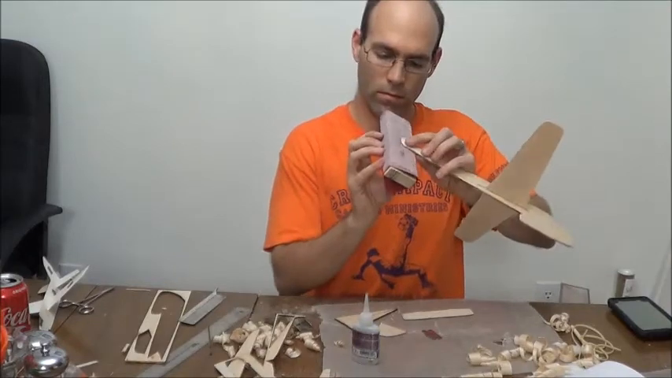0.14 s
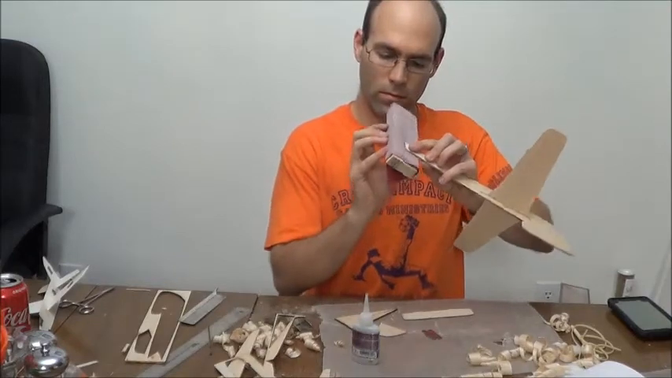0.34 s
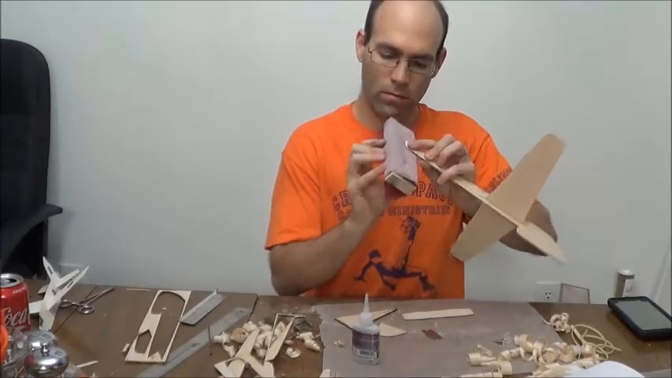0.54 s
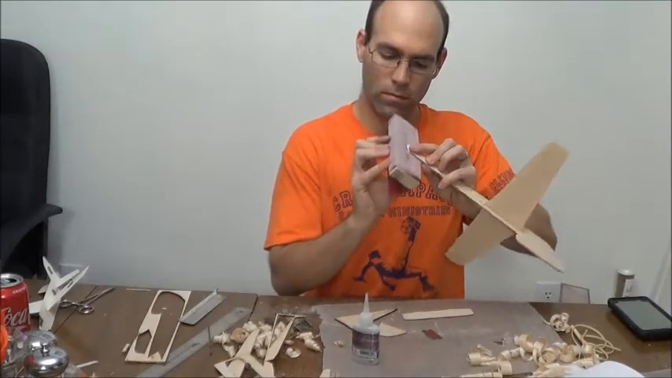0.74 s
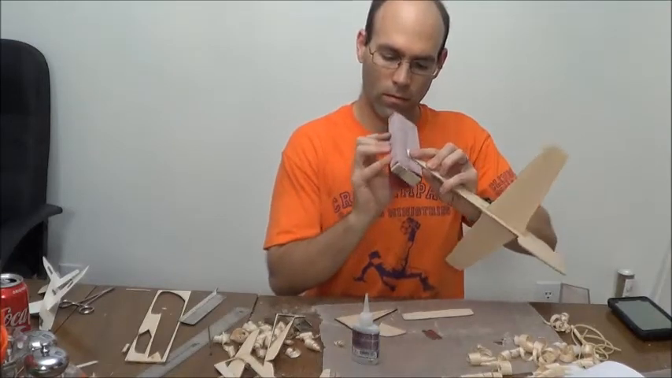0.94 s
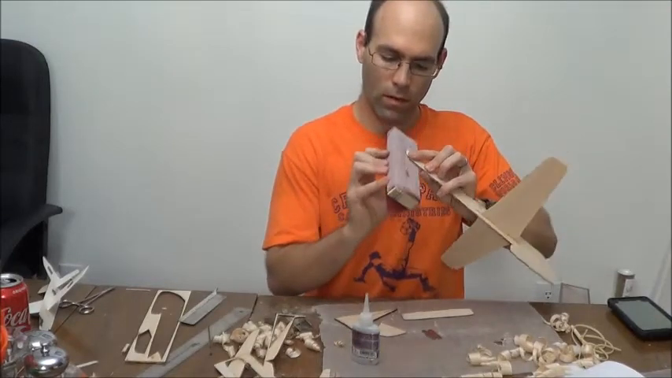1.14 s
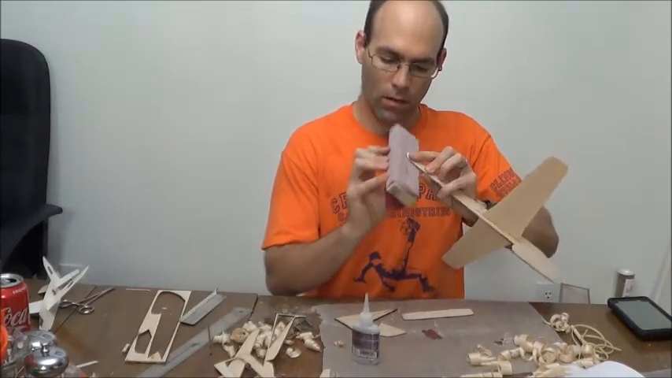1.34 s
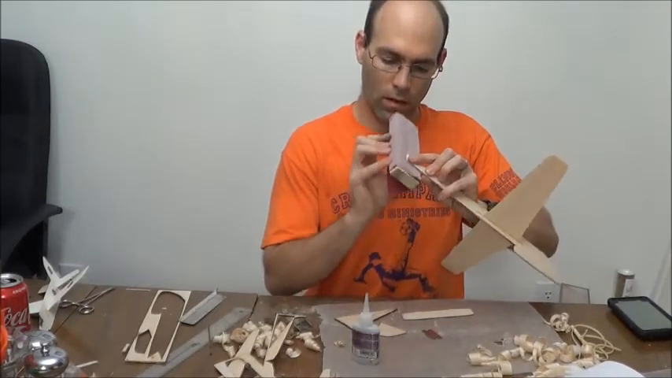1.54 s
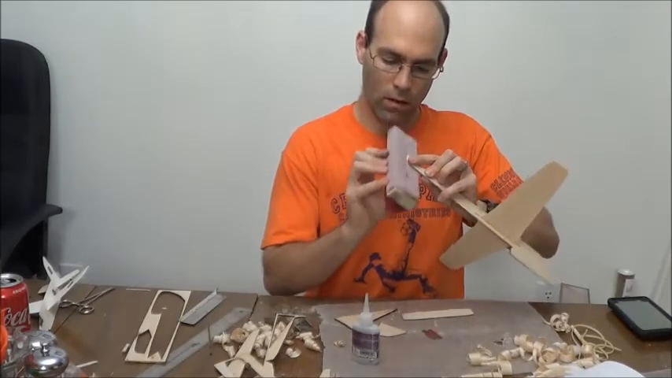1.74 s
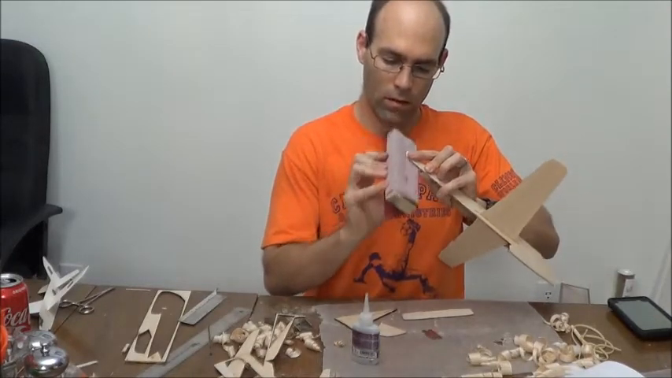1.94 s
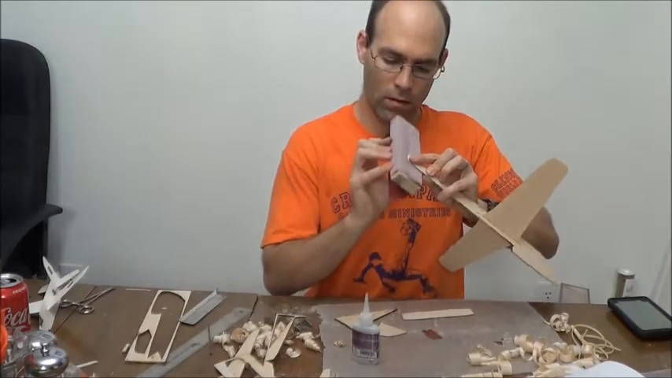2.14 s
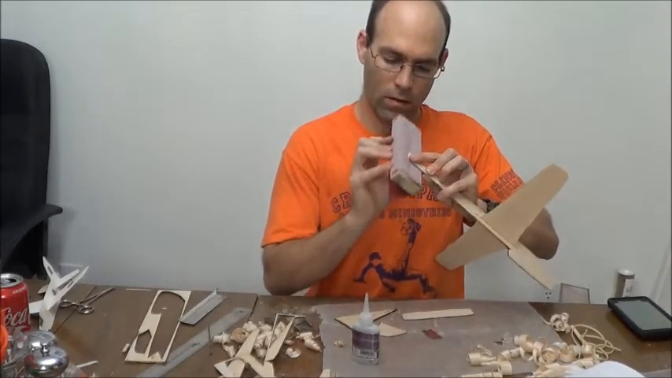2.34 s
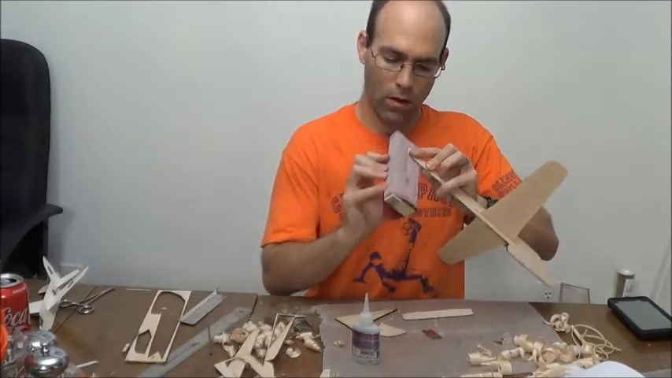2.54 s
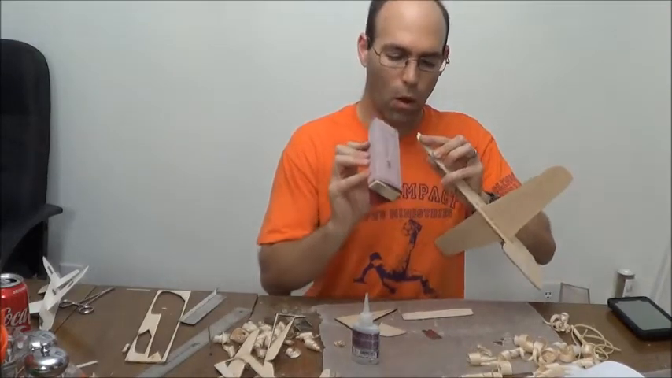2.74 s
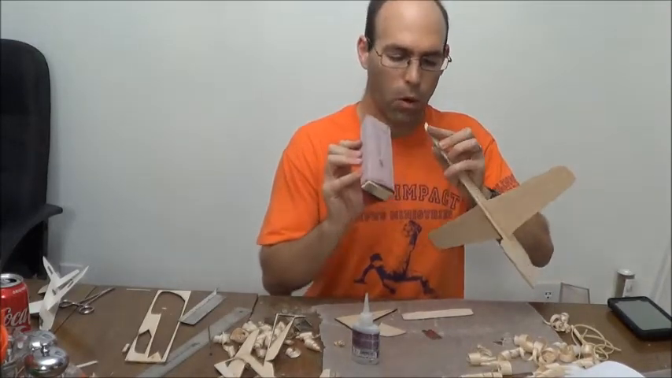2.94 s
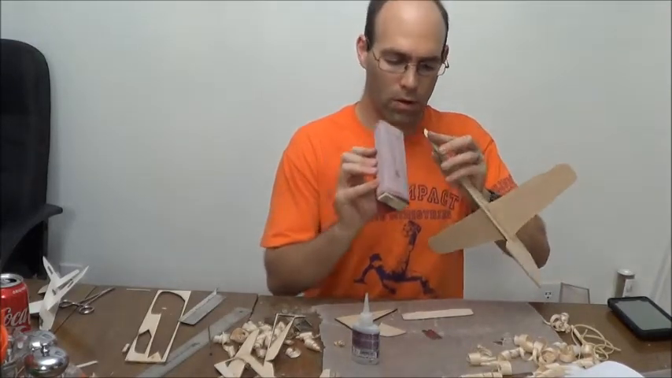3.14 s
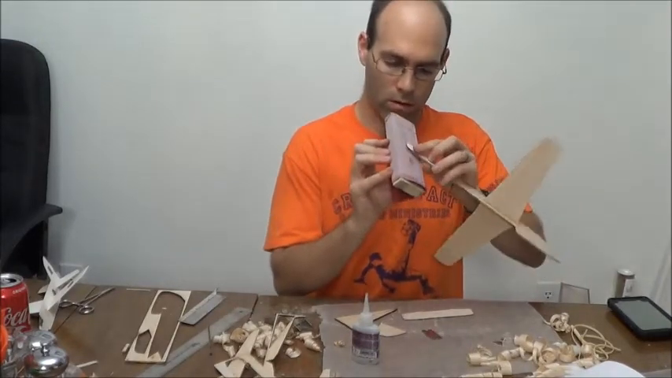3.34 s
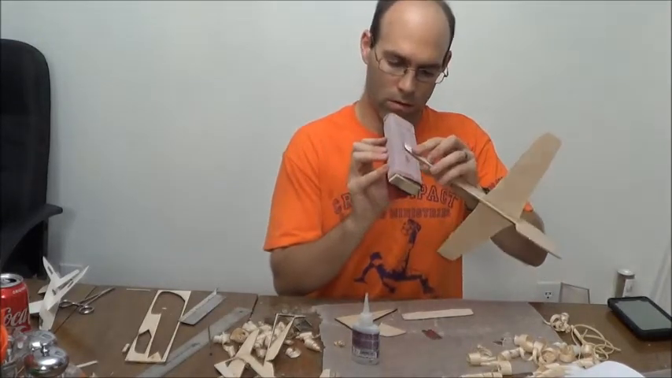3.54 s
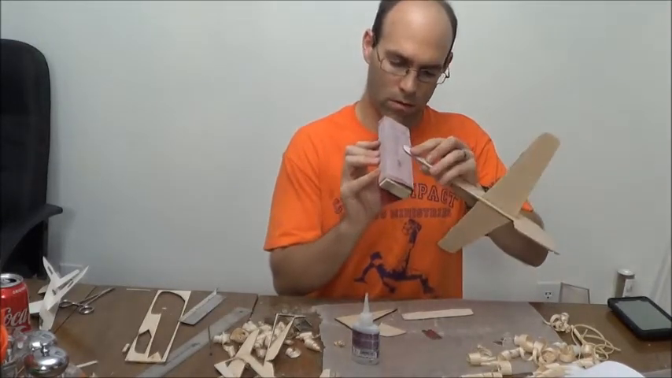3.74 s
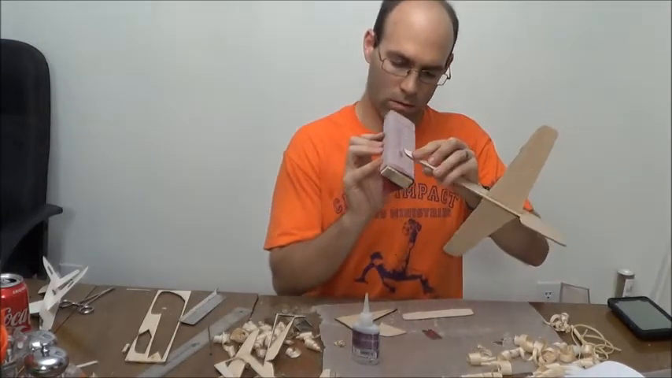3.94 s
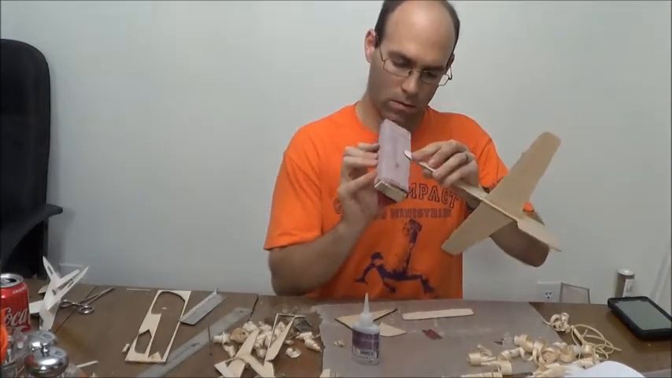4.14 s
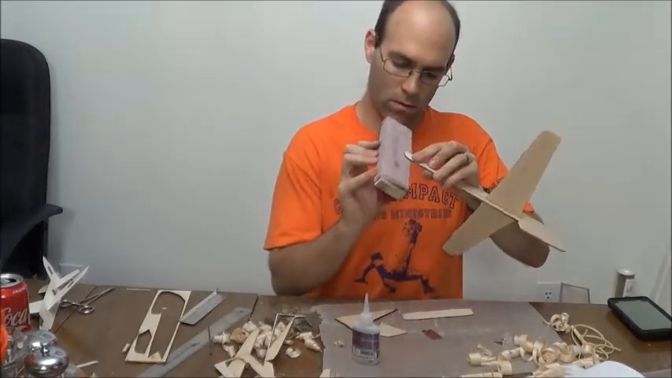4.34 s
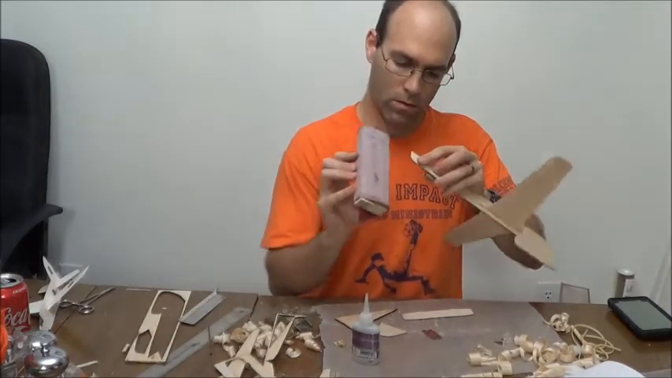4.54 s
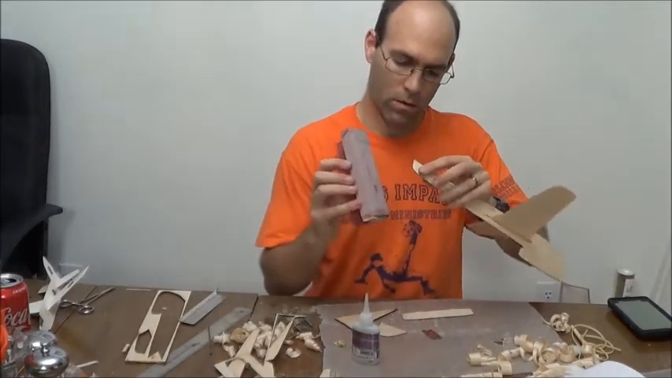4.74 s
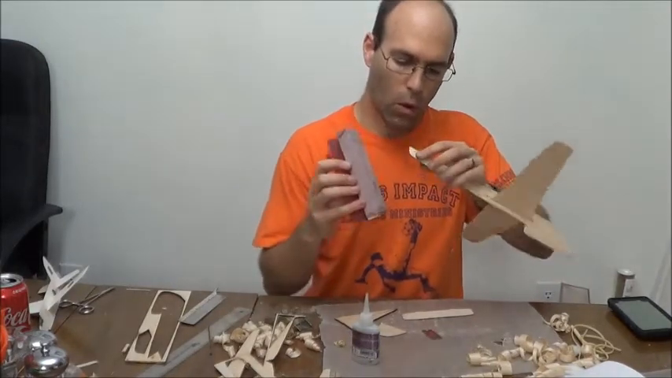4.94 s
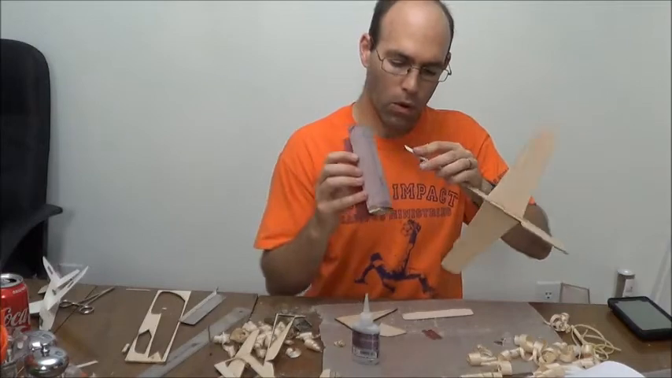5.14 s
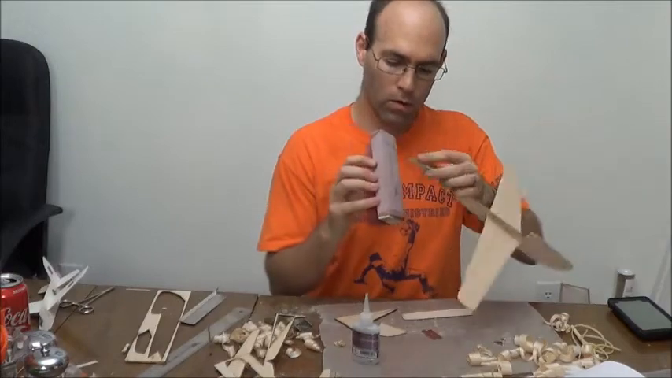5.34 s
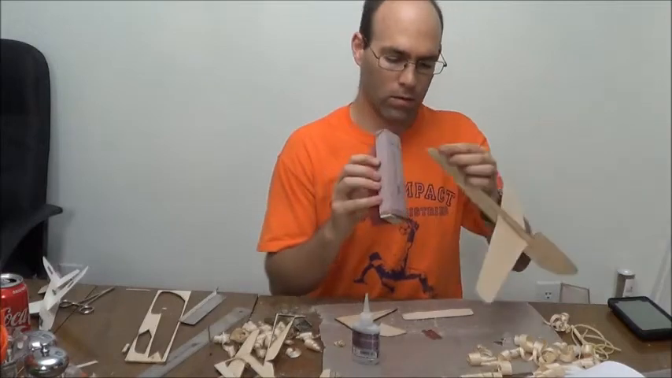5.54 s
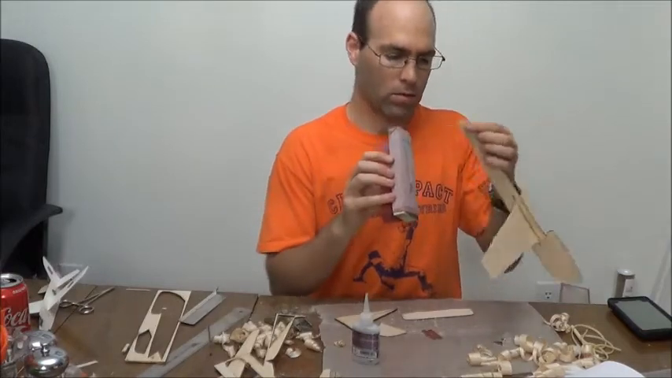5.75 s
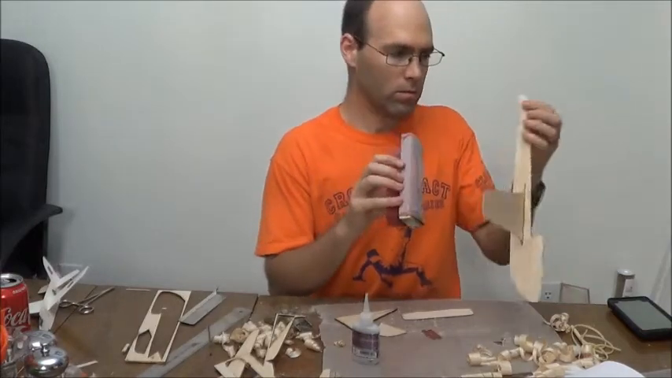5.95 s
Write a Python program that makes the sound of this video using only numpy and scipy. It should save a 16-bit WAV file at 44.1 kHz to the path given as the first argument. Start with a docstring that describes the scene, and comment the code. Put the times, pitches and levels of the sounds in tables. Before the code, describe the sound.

A small bare room holds steady airy noise, a very faint low mains hum and a thin, very high whistle. Light scuffs open the scene at 0-0.2 s. From 0.2 to 2.6 s a sanding block rubs to and fro on light balsa, about seven strokes a second; each swells and fades as bright gritty hiss, with a quieter hollow, papery ringing of thin wood. Some strokes are stronger, alternating slightly. A pause follows, with a faint brush near 3.0 s and small ticks at 3.35-3.5 s. Two very faint rubs lead into four softer, slightly slower strokes at 3.85-4.5 s. Light scuffs and two small ticks come at 4.6-4.8 s, then quiet. Handling rustles begin at 5.3 s; the sharpest knock, at 5.43 s, rattles woodily until 5.6 s. Another scuff and small taps come at 5.7-5.9 s. The bench sounds are close and central, with a short, wide echo.

```python
"""A light scuff over room hum, then a sanding block rubs to and fro on the nose of a balsa glider.
The place is a small bare room. Clumped grit clicks make the bright hiss and set the thin sheets ringing;
in the pauses hands and parts scuff (softer grit) and tap (noise bursts into wood resonances).
Steady noise, a low mains tone and a very high whistle lie underneath; a wide echo surrounds the bench."""
import sys
import numpy as np
from scipy import signal
from scipy.io import wavfile
from scipy.ndimage import uniform_filter1d

SR = 44100
rng = np.random.default_rng(int(sys.argv[2]) if len(sys.argv) > 2 else 0)


def to_wav(s):
    """Save 16-bit WAV."""
    ch = np.atleast_2d(s).T  # columns
    pcm = np.round(np.clip(ch, -1, 1) * 32767)  # PCM
    wavfile.write(sys.argv[1], SR, pcm.astype(np.int16))


N = 263718

# Bright hiss of grit on wood. Each row: frequency in Hz, relative spectral level in dB.
GRIT_HISS = [(120, -44), (1300, -30), (2300, -19), (2800, -13.5), (3500, -9.5), (4600, -12), (5200, -7),
             (6100, -6), (7200, -9), (8200, -3), (8900, 1.5), (10500, -1.5), (12500, -5.5), (13500, -9),
             (14300, -10), (15200, -12.5), (15800, -18)]
# Balsa sheets held in the hand, lowest mode first.
# Each row: frequency in Hz, width of one filter pass in Hz, relative level in dB.
SHEET_MODES = [(484, 65, -4), (795, 50, -11), (850, 60, -14), (915, 60, -11), (1040, 70, -10),
               (1105, 60, -3), (1288, 50, -7), (1357, 50, -8), (1405, 40, -11), (1630, 60, -6),
               (1700, 60, -5), (1775, 70, -1.5), (1840, 80, 1.5), (2095, 100, -9), (2208, 90, -3),
               (2295, 70, -10), (2440, 130, -8), (2580, 100, -9)]


def gain_of(db):
    """Decibels to amplitude."""
    return 10 ** (np.asarray(db) / 20)


def evened(x):
    """Scales to rms 1."""
    return x / np.sqrt(np.mean(x ** 2) + 1e-20)


def read(points, hz):
    """Reads a curve of (Hz, value) points on a log-frequency axis."""
    f, value = np.transpose(points)
    return np.interp(np.log(hz + 1), np.log(f + 1), value)


def coloured(x, points):
    """Causal, minimum-phase filter with the given spectrum, scaled to keep the level of white input."""
    hz = abs(np.fft.fftfreq(4096, 1 / SR))
    log_gain = np.log(gain_of(np.maximum(read(points, hz), -100)))
    response = np.exp(np.conj(signal.hilbert(log_gain)))
    impulse = np.fft.ifft(response).real[:2048]
    return signal.oaconvolve(x, impulse / np.linalg.norm(impulse), axes=-1)[:len(x)]


def rung(x, modes):
    """Sum of fixed resonances, each applied twice for dark valleys; neighbours swing in opposite sense."""
    out = np.zeros(len(x))
    for k, (hz, width, db) in enumerate(modes):
        b, a = signal.iirpeak(hz, hz / max(width, 5), SR)
        once = signal.lfilter(b, a, x)
        out += (-1) ** k * gain_of(db) * signal.lfilter(b, a, once)
    return out


def grains(per_s, spread_db, clump_db):
    """Grit particles catching fibres: dense clicks of uneven size that come in short clumps."""
    sign = rng.choice([-1., 1.], N)
    size = gain_of(spread_db * np.minimum(rng.exponential(1, N), 3.5)) * sign
    drift = uniform_filter1d(rng.standard_normal(N), 70)
    clumps = evened(uniform_filter1d(drift, 70))
    catches = rng.random(N) < per_s / SR
    return evened(size * catches * gain_of(clump_db * clumps))


def shuffled(grit):
    """The same clicks with newly drawn signs, so that layers sharing their timing stay unrelated in phase."""
    return grit * rng.choice([-1., 1.], N)


def patchy(x, patchy_db):
    """The contact shifts, so parts of the spectrum swell and sink."""
    z = signal.stft(x, nperseg=256)[2]
    across_hz = uniform_filter1d(rng.standard_normal(z.shape), 4, 0)
    patches = evened(uniform_filter1d(across_hz, 24, 1))
    return evened(signal.istft(z * gain_of(patchy_db * patches), nperseg=256)[1][:N])


def ringing(grit, gain, modes):
    """Grit under a gain curve drives modes, scaled to about rms 1 at gain 1."""
    return rung(shuffled(grit) * gain, modes) / np.std(rung(grit, modes))


def hum():
    """Steady air and electronics noise with slight patches, plus a mains tone, its octave and a whistle."""
    # Steady tones. Each row: frequency in Hz, rms level in dB ahead of the microphone.
    tone_rows = [(60, -74), (120, -73), (15735, -53.5)]
    # Stereo likeness of the noise. Each row: frequency in Hz, left-right likeness from 0 to 1.
    likeness = [(60, .99), (150, .98), (380, .8), (950, .24), (2380, .18), (5980, .47), (11000, .9),
                (15000, .99)]
    # Room and electronics noise. Each row: frequency in Hz, relative spectral level in dB.
    air = [(18, -40), (30, -19), (60, -14), (100, -11), (160, -6), (250, -2), (400, 0), (630, -5),
           (1000, -4.5), (2000, -9), (4000, -11), (6300, -11), (9000, -9.5), (13000, -14), (15800, -15)]
    air_db, patch_db = -43.7, 0.77

    frames, hz = N // 256 + 5, np.fft.rfftfreq(1024, 1 / SR)
    a, b, c, d, patches = rng.standard_normal((frames, 513, 5)).T
    patches = evened(uniform_filter1d(uniform_filter1d(patches, 12, 0), 14, 1))
    same = np.clip(read(likeness, hz), -1, 1)[:, None]
    left = a + 1j * b
    right = same * left + np.sqrt(1 - same ** 2) * (c + 1j * d)
    z = np.array([left, right]) * gain_of(read(air, hz)[:, None] + patch_db * patches)
    noise = evened(signal.istft(z, nperseg=1024, noverlap=768)[1][:, :N])

    t, tones = np.arange(N) / SR, np.zeros(N)
    for f, db in tone_rows:
        tones += np.sqrt(2) * gain_of(db) * np.sin(2 * np.pi * (f * t + rng.random()))
    return gain_of(air_db) * noise + tones


def brushes():
    """Each scuff rises, holds and dies away; hiss and rustle share the shape."""
    # Light scuffs of fingers, block and parts. Each row: start, rise, hold and fade in seconds,
    # relative hiss in dB, relative low rustle in dB.
    scuff_rows = [(0.0, 0.0029, 0.051, 0.063, -40, -49), (0.076, 0.036, .008, 0.055, -36.5, -63),
                  (3.031, .02, 0.022, 0.02, -41.5, -54.5), (3.241, 0.014, 0.027, 0.3, -49, -57.5),
                  (3.378, 0.0078, .003, .025, -35, -42.5), (3.4, .01, .075, .035, -47.5, -56.5),
                  (4.61, .012, .012, 0.12, -42.5, -57), (4.64, 0.062, 0.072, 0.018, -39, -52.5),
                  (5.315, 0.019, .016, 0.069, -36, -55), (5.386, 0.036, .006, 0.044, -32.5, -48),
                  (5.425, .006, .008, 0.16, -29.5, -37.5), (5.706, 0.053, 0.058, .04, -34, -49),
                  (5.873, .003, .016, .05, -30, -40), (5.888, .012, .04, .06, -48, -46)]
    fade_db = -20  # lost in one fade time
    t, gains = np.arange(N) / SR, np.zeros((2, N))
    for start, rise, hold, fade, hiss_db, rustle_db in scuff_rows:
        onset = np.clip((t - start) / max(rise, .001), 0, 1) ** 2
        fades_passed = np.maximum(t - start - rise - hold, 0) / max(fade, .005)
        gains += gain_of([[hiss_db], [rustle_db]]) * onset * gain_of(fade_db * fades_passed)
    return gains


def scuffs():
    """Sparser, lighter friction; the sheets ring a little here too."""
    # Low rustle. Each row: frequency in Hz, relative spectral level in dB.
    rustle_spectrum = [(150, -35), (410, -10), (700, 1.5), (941, 0), (1090, -15), (1220, -5), (1850, -7),
                       (2370, -16), (5000, -30.5), (6500, -22), (11000, -120)]
    # Scuff hiss. Each row: frequency in Hz, relative spectral level in dB.
    hiss_spectrum = [(1760, -28), (3000, -5.5), (3440, -6), (4600, -8.5), (4800, -8), (6150, -0.5),
                     (7200, -7), (8160, -1), (9830, 1), (15600, -16)]
    hiss_gain, body_gain = brushes()
    grit = grains(per_s=6000, spread_db=3.6, clump_db=0.43)
    rustle = body_gain * patchy(coloured(shuffled(grit), rustle_spectrum), 4.8)
    hiss = hiss_gain * patchy(coloured(grit, hiss_spectrum), 2.9)
    return hiss + rustle + gain_of(1.5) * ringing(grit, body_gain, SHEET_MODES)


def taps():
    """A gritty tick of a few ms, and the wood ringing and rattling under it."""
    # Taps of wood on block or bench. Each row: start in seconds, relative tick level in dB,
    # duller part of the tick over it in dB, drive of the knock's body over the tick in dB.
    tap_rows = [(3.3548, -36.5, -2, -14), (3.3847, -24.5, 0.5, -20), (3.4144, -33, -11, -14),
                (3.4715, -29.5, -29, -39), (4.6937, -25.5, -3.5, -25.5), (4.7915, -24, -27, -19.5),
                (5.4311, -13.5, 2.5, -10), (5.4444, -24, -19, -4.5), (5.4844, -22.5, -13.5, -1.5),
                (5.5114, -26.5, 3, -1.5), (5.5494, -28, -15, -15), (5.5894, -42, -9, -7),
                (5.8262, -23, -19, -27), (5.8754, -23.5, -17, -20), (5.8844, -19.5, 2, -25)]
    # Knocked wood. Each row: frequency in Hz, width of one filter pass in Hz, relative level in dB.
    knock_modes = [(550, 110, 5.5), (620, 74, 4), (723, 97, 5.5), (845, 110, -5), (1020, 130, -4),
                   (1170, 83, 5.5), (1296, 120, -4), (1383, 150, 3), (1830, 90, -14.5), (2410, 79, -17)]
    t, tick, blow = np.arange(1500) / SR, np.zeros(N + 1500), np.zeros(N + 1500)
    # a sharp decay with a longer, weaker one under it
    snap = 0.47 * (np.exp(-t / 0.0018) + 0.36 * np.exp(-t / 0.012))
    push = 10.5 * (np.exp(-t / 0.00089) + 0.2 * np.exp(-t / .015))
    dull_band = signal.butter(2, [1300, 4200], "band", fs=SR)
    for start, tick_db, dull_db, body_db in tap_rows:
        bright, dull, low = rng.standard_normal((3, len(t)))
        dull = evened(signal.lfilter(*dull_band, dull))
        first = round(start * SR)
        at = slice(first, first + len(t))
        tick[at] += gain_of(tick_db) * (coloured(bright, GRIT_HISS) + gain_of(dull_db) * dull) * snap
        blow[at] += gain_of(tick_db + body_db) * low * push
    return (tick + rung(blow, knock_modes))[:N]


def arches():
    """Block speed is a skewed, flat-topped arch; hiss follows it closely, the wood less so."""
    # Strokes of the block. Each row: start in seconds, length in seconds, share of the length at top
    # speed from 0 to 1, then relative levels in dB of grit hiss, sheet ringing and lowest mode.
    strokes = [(.216, .16, .45, -21, -34.5, -45.5), (0.421, 0.15, 0.39, -18, -32.5, -41.5),
               (.587, .14, 0.34, -16.5, -31, -44.5), (0.743, .13, 0.42, -17, -33.5, -47),
               (0.89, .136, .33, -15, -31, -43), (1.037, .128, 0.39, -16, -33.5, -47),
               (1.182, .132, 0.34, -13.5, -31.5, -46), (1.331, 0.13, 0.3, -16, -33.5, -46),
               (1.475, 0.12, 0.36, -14, -32, -44), (1.622, 0.12, .33, -19, -32, -42),
               (1.767, 0.12, .38, -12, -33, -47), (1.903, 0.12, 0.36, -16.5, -35.5, -45),
               (2.045, 0.12, 0.34, -14, -31, -41), (2.184, 0.1, 0.38, -15.5, -36, -44),
               (2.316, 0.12, .4, -14.5, -33, -45), (2.462, 0.15, .33, -16, -33.5, -47.5),
               (3.54, .16, .6, -39, -49, -50), (3.64, .18, .6, -33, -45, -45),
               (3.852, 0.13, 0.38, -24.5, -35, -48.5), (4.012, .139, 0.44, -22, -35, -48),
               (4.171, .138, 0.36, -22.5, -36, -48), (4.327, .16, 0.42, -21.5, -35.5, -51)]
    cruise = 1.3  # how far the arm levels off the top of the arch
    hiss_law, ring_law, lowest_law = 1.9, .7, .4  # each gain is the block's speed to this power
    # the turn of direction jolts the lowest mode, and the higher ones by a share of it
    peak_jolt_db, jolt_s, jolt_share = 4.5, .018, .4
    grip_db, grip_s = 1.1, .025  # the grip on the sheets wavers by chance

    gains = np.zeros((3, N))
    for start, length, top, hiss_db, ring_db, lowest_db in strokes:
        t = np.arange(0, length, 1 / SR)
        skew = np.log(.5) / np.log(np.clip(top, .1, .9))  # puts the peak at the share "top"
        arch = abs(np.sin(np.pi * (t / length) ** skew))
        speed = np.tanh(cruise * arch) / np.tanh(cruise)
        jolt_db = peak_jolt_db * np.exp(-(t / jolt_s - 1) ** 2)
        first = round(start * SR)
        gains[:, first:first + len(t)] += [
            gain_of(hiss_db) * speed ** hiss_law,
            gain_of(ring_db + jolt_share * jolt_db) * speed ** ring_law,
            gain_of(lowest_db + jolt_db) * speed ** lowest_law]
    grip = evened(uniform_filter1d(rng.standard_normal((2, N)), round(grip_s * SR)))
    return gains * np.vstack([np.ones(N), gain_of(grip_db * grip)])


def sanding():
    """The same grit clicks radiate as hiss and drive the sheets; the grip frees or damps the modes."""
    # Ringing between the modes. Each row: frequency in Hz, relative spectral level in dB.
    wash_spectrum = [(150, -38), (300, -22.5), (600, -15), (1000, 0.5), (1500, -5), (2000, -3), (3000, -24),
                     (4000, -28), (6600, -69)]
    hiss_gain, body_gain, lowest_gain = arches()
    grit = grains(per_s=12000, spread_db=1.4, clump_db=0.77)
    wash = gain_of(-7.5) * coloured(shuffled(grit) * body_gain, wash_spectrum)
    higher = ringing(grit, body_gain, SHEET_MODES[1:])
    lowest = ringing(grit, lowest_gain, SHEET_MODES[:1])
    hiss = hiss_gain * patchy(coloured(grit, GRIT_HISS), 1.7)
    return hiss + higher + lowest + wash


def room(x, turns=2.6):
    """Sparse echoes of random sign, each band dying at its own speed; a side tail parts left from right.
    The sound passes smoothly in turn through three such echoes, so no single echo colours it throughout."""
    # Decay of the room. Each row: frequency in Hz, time to fall by 60 dB in seconds.
    decay = [(200, 1), (1000, 0.59), (4000, 0.57), (9000, 0.31), (15000, 0.2)]
    # Width of the echo. Each row: frequency in Hz, side level relative to mid in dB.
    side_width = [(100, -70), (500, -7), (2000, -8), (8000, -5.5), (11000, -10), (13000, -59)]
    out = np.zeros((2, N))  # mid, side
    for k in range(3):
        hits = np.zeros((2, SR))
        # one hit at a random place in every 20 samples
        at = np.arange(200, SR - 20, 20) + rng.integers(0, 20, (2, (SR - 201) // 20))
        np.put_along_axis(hits, at, rng.choice([-1., 1.], at.shape), 1)
        hz, t, z = signal.stft(hits, SR, nperseg=256)
        z *= gain_of(-60 * t / read(decay, hz)[:, None])
        z[1] *= gain_of(read(side_width, hz))[:, None]
        tail = signal.istft(z, SR, nperseg=256)[1]
        tail /= np.linalg.norm(tail[0])
        # the squares of the three shares always sum to 1
        share = np.sqrt(2 / 3) * np.cos(np.pi * (turns * np.arange(N) / SR + k / 3))
        out += signal.fftconvolve((share * x)[None], tail, axes=1)[:, :N]
    mid, side = out
    return np.array([mid + side, mid - side])


def scene():
    """Bench sounds at the centre, their echo, and the hum."""
    bench = scuffs() + taps() + sanding()
    direct_db, room_db = 1.18, -5
    return gain_of(direct_db) * bench + gain_of(room_db) * room(bench) + hum()


def record(dry):
    """A microphone that rolls off the deepest bass and rounds the highest peaks, then the band limit."""
    edge_hz = 15790
    thin = signal.lfilter(*signal.butter(2, 45, "high", fs=SR), dry)
    rounded = 1.3 * np.tanh(thin / 1.3)
    band_limit = signal.firwin(1535, edge_hz, window=("kaiser", 8), fs=SR)
    return signal.oaconvolve(rounded, band_limit[None], "same")


dry = scene()
out = record(dry)
to_wav(out)
```